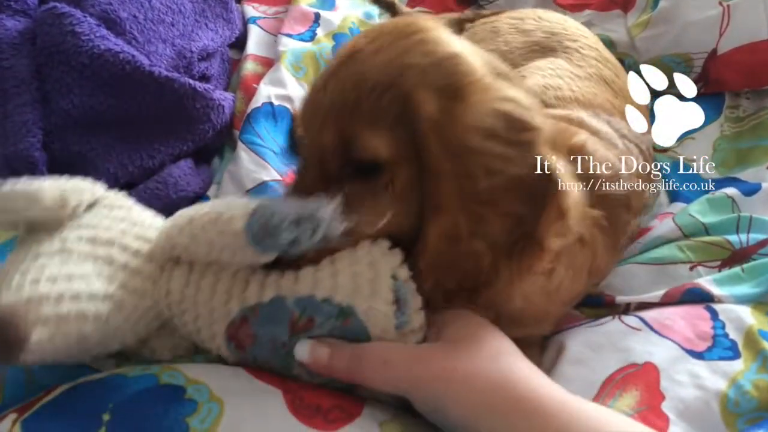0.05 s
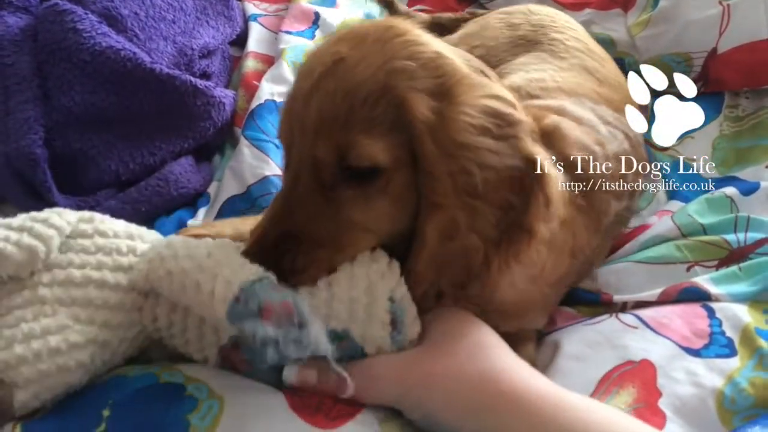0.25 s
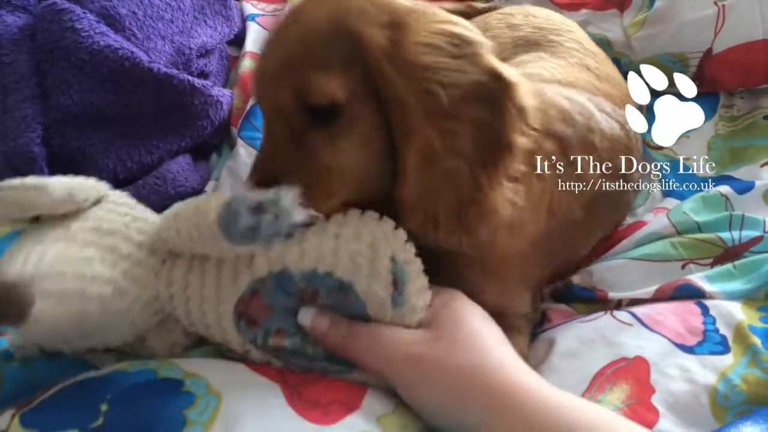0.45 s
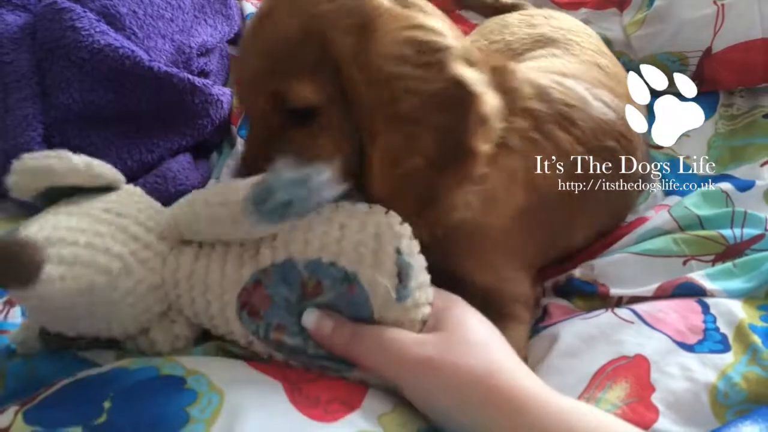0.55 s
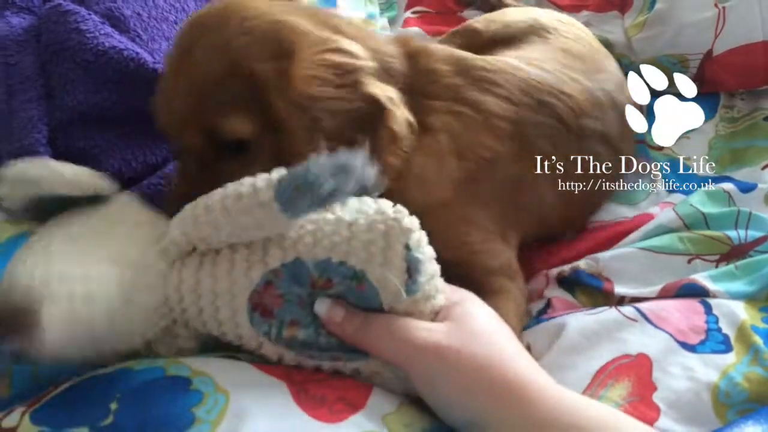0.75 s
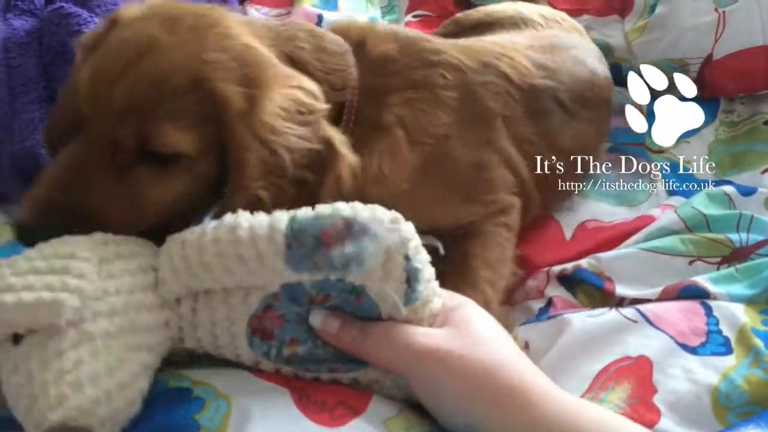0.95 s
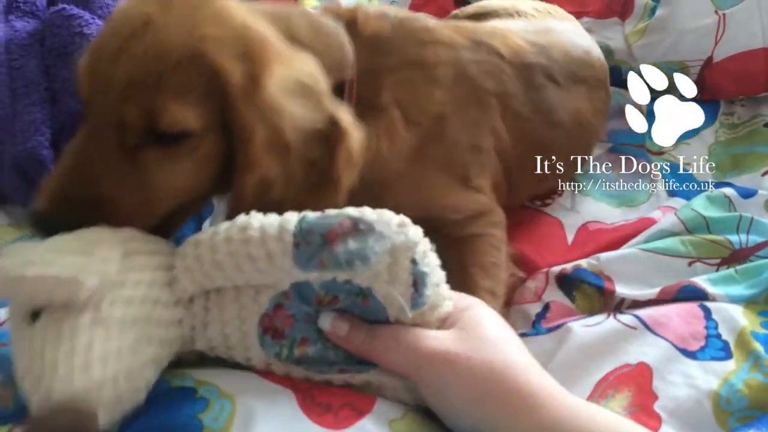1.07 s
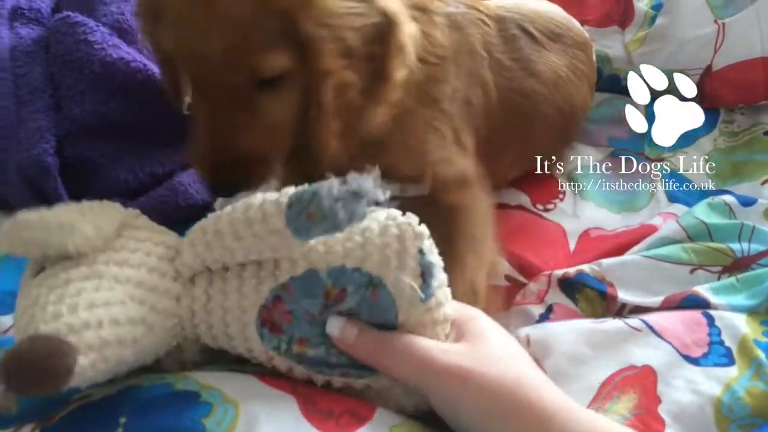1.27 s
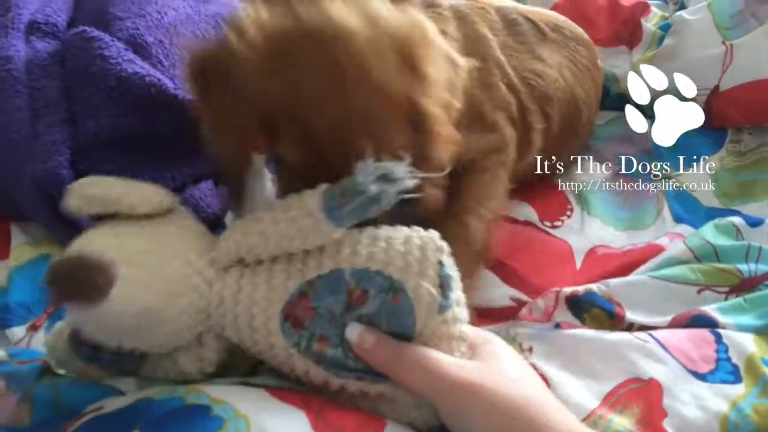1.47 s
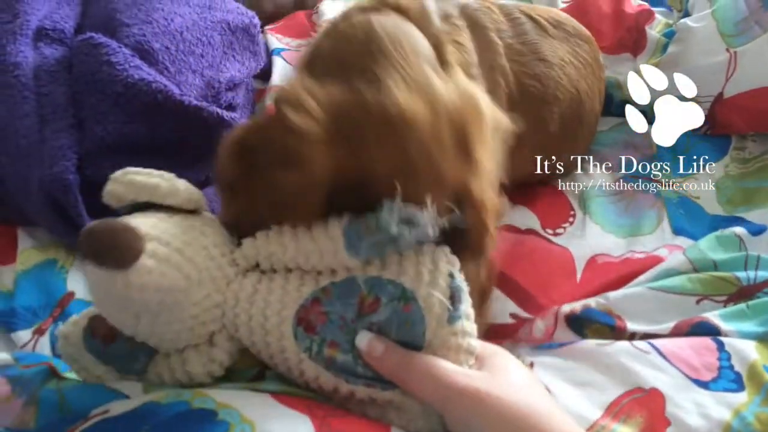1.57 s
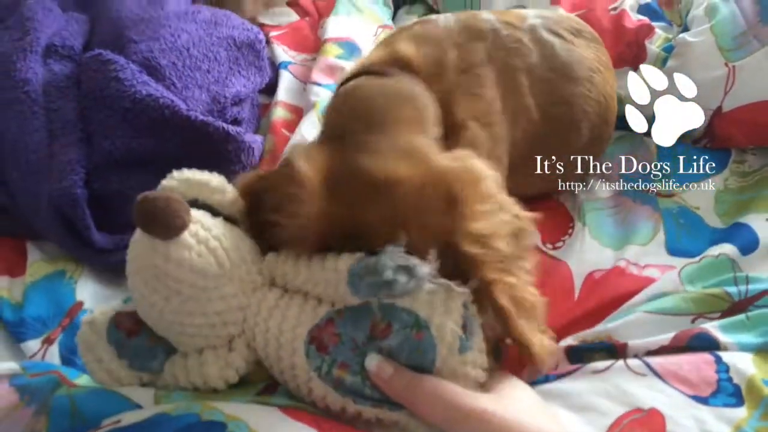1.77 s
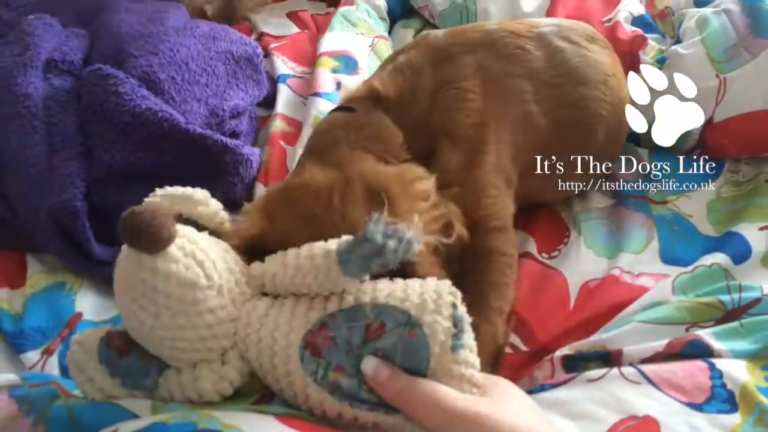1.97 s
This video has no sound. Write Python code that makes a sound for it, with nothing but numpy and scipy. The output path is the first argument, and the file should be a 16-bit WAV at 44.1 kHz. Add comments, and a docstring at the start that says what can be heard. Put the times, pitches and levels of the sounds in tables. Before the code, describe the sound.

A plush dog toy gives one very short, shrill squeak over faint rustling bedding indoors

```python
"""Rustling bedding is heard first, with dull knocks, dry snaps of teeth and faint clinks of a collar tag.
Then a puppy on a bed in a small room bites the squeaker of a plush toy once: a vibrating reed
sings a bright harmonic note, then sags and rasps as the air runs out, under a faint treble hiss.
Soft pops of mouth and toy are short tones that rise in pitch; knocks, snaps and tag are damped resonances.
Cloth, air and quiet background are coloured noise; wall echoes and a short tail make the room."""
import sys
import numpy as np
from scipy import signal
from scipy.fft import rfft, irfft
from scipy.io import wavfile

SR = 44100
rng = np.random.default_rng(int(sys.argv[2]) if len(sys.argv) > 2 else 0)


def file_out(sig):
    """Save sig as 16-bit WAV at sys.argv[1]."""
    # one column per channel
    cols = np.atleast_2d(sig).T
    # limit, then scale
    lim = np.clip(cols, -1, 1)
    pcm = np.round(lim * 32767).astype(np.int16)
    wavfile.write(sys.argv[1], SR, pcm)


N = 88905
T = np.arange(N) / SR  # seconds

# The reed through one bite. Each row: time in seconds, pitch in Hz, level in dB, air relative to the note in dB.
REED_COURSE = [(1.1052, 1850, -62.5, -23), (1.108, 1862, -14, -28), (1.118, 1867, -15, -28.5),
               (1.130, 1866, -15.5, -28.5), (1.135, 1921, -13.5, -27.5), (1.146, 1915, -14.2, -26.5),
               (1.152, 1895, -16.5, -21.5), (1.158, 1865, -16.5, -12), (1.164, 1632, -24, -6),
               (1.169, 1592, -28, -10), (1.175, 1500, -57.5, -9)]
# Spectral envelope of the squeaker. Each row: frequency in Hz, relative level of a harmonic there in dB.
REED_ENVELOPE = [(1550, 0.5), (1865, -7), (1920, -11), (3100, -3), (3780, -5.5), (5650, -3), (7570, 0.5),
                 (9300, -4), (9560, -4.5), (10200, -13), (11200, -6.5), (11500, -11.5), (12100, -29),
                 (13080, -13), (13420, -18), (14000, -43.5), (14950, -20.5), (15350, -37.5)]
# The pitch turns unsteady as it sags below SLACK_HZ; jitter is the rms fraction of the pitch.
JITTER, JITTER_SLACK, JITTER_RATE_HZ = 0.002, 0.013, 630
SLACK_HZ, SLACK_SPAN_HZ = 1850, 150
REED_LAG = 0.25  # the housing delays the upper harmonics (radians per harmonic number squared)
# Colour of the air through the reed. Each row: frequency in Hz, relative level in dB.
AIR_COLOUR = [(200, -49), (1200, -40.5), (1700, -10), (2100, -25), (2600, -43), (3400, -7.5), (4300, -18.5),
              (5200, -2.5), (7000, 0), (9200, 0.5), (10200, -7), (11200, 1), (12100, -21.5), (13200, -8),
              (14000, -31), (15100, -15)]
# Shrill side tones near the fifth harmonic. Each row: frequency in Hz, peak relative to the note's rms in dB.
SHRILL_TONES = [(9015, -15), (9188, -11)]
SHRILL_START_S, SHRILL_END_S, SHRILL_FADE_S = 1.108, 1.141, 0.004

# Treble hiss around the end of the note: start, level at the start, rise time and rate of fading.
HISS_S, HISS_DB, HISS_RISE_S, HISS_FADE_DB_PER_S = 1.143, -51.5, 0.006, 173.5
# Colour of that hiss. Each row: frequency in Hz, relative level in dB.
HISS_COLOUR = [(1000, -46.5), (4400, -21.5), (5200, -9), (8300, 2), (9600, 2), (11500, -4), (12200, -14.5),
               (13200, -11.5), (14000, -24.5), (15200, -19)]

# Soft pops of mouth and toy. Each row: start in seconds, peak in dB, start pitch in Hz, end pitch in Hz,
# half the time to the peak in seconds.
POP_EVENTS = [(1.157, -49, 703, 1100, 0.00032), (1.2339, -46, 1110, 1320, 0.00053),
              (1.2762, -30.5, 897, 1180, 0.00037), (1.3322, -26.5, 417, 1367, 0.00071)]
POP_GLIDE_S = 0.0018

# Dull knocks on the bedding. Each row: start in seconds, peak in dB, centre frequency in Hz.
KNOCK_EVENTS = [(0.2955, -53.5, 280), (0.458, -54, 326), (.4868, -35.5, 324), (0.498, -56, 327),
                (1.1014, -48.5, 130), (1.2761, -43.5, 296), (1.3327, -35.5, 291), (1.392, -58, 110)]
KNOCK_SPREAD = 1.7  # band edges of a knock, as a ratio to its centre
# Dry snaps of teeth on fabric. Each row: start in seconds, level in dB that the mode levels add to.
SNAP_EVENTS = [(0.296, -55.5), (.4866, -31), (1.2762, -70)]
# Resonances of a snap. Each row: frequency in Hz, relative level in dB, time to fall by 60 dB in seconds.
SNAP_RESONANCES = [(740, 4.5, 0.0037), (2360, -2, 0.0033), (5000, -19, 0.0047), (8500, -14.5, 0.00086)]
SNAP_LOW_HZ = 294

# Touches of the collar tag. Each row: start in seconds, level in dB that the mode levels add to,
# time to fall by 60 dB in seconds, initial rms of the contact noise in dB.
TAG_TOUCHES = [(0.405, -52, 0.065, -48.5), (.6255, -57, 0.066, -49.5), (1.338, -60, 0.054, -61),
               (1.4488, -58, .13, -78), (1.518, -52.5, .03, -50.5), (1.521, -52.5, 0.039, -53)]
# Modes of the tag. Each row: frequency in Hz, relative level in dB.
TAG_MODES = [(5010, -14.5), (8618, 3), (11500, -16)]
# Colour of the contact noise. Each row: frequency in Hz, relative level in dB.
CONTACT_COLOUR = [(500, -34), (2000, -3), (3300, -4), (8500, -1.5), (11000, -17), (15000, 1)]
CONTACT_S = 0.0015  # exponential decay time

# Light crackles of cloth. Each row: start in seconds, level in dB before CRACKLE_GAIN_DB, centre in Hz.
CRACKLE_EVENTS = [(0.295, -58, 5600), (0.655, -55, 1120), (0.967, -56, 10900)]
CRACKLE_GAIN_DB, CRACKLE_S = -6, 0.0022  # the second is an exponential decay time

# Movement on the bed. Each row: time in seconds, rustle level in dB, low shuffle level in dB.
BED_MOVEMENT = [(0, -64.5, -72), (.1, -73, -74), (.2, -72, -69.5), (.27, -68.5, -72.5), (.335, -66, -64.5),
                (.37, -69, -72), (.45, -66.5, -71), (.53, -77.5, -67.5), (.57, -72.5, -81), (.66, -68, -68),
                (.73, -76, -72), (.82, -68, -61.5), (.9, -74, -77), (1.03, -73, -83), (1.2, -79.5, -87.5),
                (1.35, -71.5, -70), (1.43, -78, -81), (1.46, -68, -76), (1.63, -67, -70), (1.76, -68, -72),
                (1.85, -73, -82), (2.02, -78.5, -91)]
# Colour of the rustle. Each row: frequency in Hz, relative level in dB.
RUSTLE_COLOUR = [(30, -35), (100, -12), (300, 1), (800, -2.5), (1500, -3), (2400, -9.5), (4000, -13),
                 (7000, -20), (15000, -27)]
# Colour of the shuffle. Each row: frequency in Hz, relative level in dB.
SHUFFLE_COLOUR = [(30, -31), (90, -1.5), (180, 0), (380, 1), (600, -11), (1500, -33), (6000, -56)]
GRAIN_DB, GRAIN_S = 1, 0.0054  # rms depth and time scale of the rustle's graininess

# Colour of the quiet air. Each row: frequency in Hz, relative level in dB.
FLOOR_COLOUR = [(20, -21.5), (38, -7.5), (52, 7.5), (75, 0.5), (150, -0.5), (400, -10.5), (1000, -13.5),
                (3000, -19), (6000, -22), (9000, -18.5), (15000, -24.5)]
FLOOR_DB = -71

# Decay of the room. Each row: frequency in Hz, time to fall by 60 dB in seconds.
ROOM_DECAY = [(200, 0.13), (1200, 0.21), (1900, .22), (5500, .23), (8000, 0.15), (15000, .16)]
# Strength of the room's tail. Each row: frequency in Hz, level in dB.
ROOM_LEVEL = [(200, -12.5), (1200, -16.5), (1900, -15), (3800, -26), (5700, -21.5), (8000, -24),
              (12000, -26), (15000, -25)]
ROOM_DELAY_S = 0.007
# Single echoes off the walls. Each row: delay in seconds, level in dB.
WALL_ECHOES = [(.0085, -21.5), (0.016, -27), (.039, -23.5)]
ECHO_TOP_HZ = 2600
LOW_CUT_HZ, EDGE_HZ = 42, 15450  # limits of the whole sound's band


def amp(db):
    """A level in decibels is twenty times the logarithm of the gain."""
    return 10 ** (np.asarray(db) / 20)


def unit(x):
    """Dividing a signal by its root mean square sets its rms to 1."""
    return x / np.sqrt(np.mean(x ** 2) + 1e-20)


def read(points, hz):
    """A spectrum is interpolated along a logarithmic frequency axis."""
    f, value = np.transpose(points)
    return np.interp(np.log(hz + 1), np.log(f + 1), value)


def add(mix, s, sound):
    """Superposition: a sound starting at s seconds adds to the mix."""
    part = mix[round(s * SR):][:len(sound)]
    part += sound[:len(part)]


def filtered_noise(gain):
    """White noise weighted by a gain per frequency bin, at rms 1."""
    return unit(irfft(rfft(rng.standard_normal(N)) * gain, N))


def noise(spectrum):
    """Coloured noise: white noise shaped by a spectral envelope."""
    return filtered_noise(amp(read(spectrum, np.fft.rfftfreq(N, 1 / SR))))


def wander(hz):
    """Smooth random fluctuation: white noise under a Gaussian low-pass."""
    return filtered_noise(np.exp(-(np.fft.rfftfreq(N, 1 / SR) / hz) ** 2))


def ring(hz, t60):
    """A damped mode: a sinusoid under exponential decay."""
    t = T[:SR // 4]
    return np.sin(2 * np.pi * hz * t) * np.exp(-np.log(1000) * t / t60)


def highpass(x, hz):
    """A second-order high-pass attenuates what lies below its corner."""
    return signal.sosfilt(signal.butter(2, hz, "highpass", fs=SR, output="sos"), x)


def shrill_tones():
    """Inharmonic partials beat with a harmonic close to them; here early in the bite."""
    tones = np.zeros(N)
    for hz, db in SHRILL_TONES:
        tones += amp(db) * np.cos(2 * np.pi * hz * T + 0.42 * wander(hz=150))
    to_nearest_end = np.minimum(T - SHRILL_START_S, SHRILL_END_S - T)
    return tones * np.clip(to_nearest_end / SHRILL_FADE_S, 0, 1)


def squeaker():
    """Self-sustained reed: it chops the air into harmonics; slack, it wobbles and hisses."""
    s, pitch, db, air_db = np.transpose(REED_COURSE)
    hz = np.interp(T, s, pitch)
    level = amp(np.interp(T, s, db)) * (T > s[0]) * (T < s[-1])
    slack = np.clip((SLACK_HZ - hz) / SLACK_SPAN_HZ, 0, 1)
    jitter = (JITTER + JITTER_SLACK * slack) * wander(JITTER_RATE_HZ)
    phase = 2 * np.pi * np.cumsum(hz * (1 + jitter)) / SR
    note = np.zeros(N)
    for k in range(1, 10):
        note += amp(read(REED_ENVELOPE, k * hz)) * np.cos(k * phase - REED_LAG * k ** 2)
    # rms 1 over the sustained part of the note
    note /= np.std(note[(T > s[1]) & (T < s[-4])])
    air = noise(AIR_COLOUR) * amp(np.interp(T, s, air_db))
    return level * (note + air + shrill_tones())


def treble_hiss():
    """Turbulent air: a faint treble hiss swells as the note sags and fades after it."""
    age = np.maximum(T - HISS_S, 0)
    rise = np.minimum(age / HISS_RISE_S, 1)
    return noise(HISS_COLOUR) * rise * amp(HISS_DB - HISS_FADE_DB_PER_S * age)


def pops():
    """Cavity resonance: an opening cavity gives a few cycles that rise in pitch."""
    out, t = np.zeros(N), T[:SR // 20]
    for s, db, start_hz, end_hz, swell in POP_EVENTS:
        hz = end_hz + (start_hz - end_hz) * np.exp(-(t / POP_GLIDE_S) ** 2)
        x = t / swell / 2  # reaches 1 at the peak
        shape = (x * np.exp(1 - x)) ** 2
        add(out, s, amp(db) * shape * np.sin(2 * np.pi * np.cumsum(hz) / SR))
    return out


def knocks():
    """Impulse response: a blow on the bedding excites one broad, heavily damped band."""
    out = np.zeros(N)
    for s, db, hz in KNOCK_EVENTS:
        edges = [hz / KNOCK_SPREAD, hz * KNOCK_SPREAD]
        band = signal.butter(2, edges, "bandpass", fs=SR, output="sos")
        bump = signal.sosfilt(band, signal.unit_impulse(SR // 10))
        add(out, s, amp(db) * bump / abs(bump).max())
    return out


def snaps():
    """Modal impact: teeth on fabric excite a few modes that die within milliseconds."""
    out = np.zeros(N)
    for s, db in SNAP_EVENTS:
        click = sum(amp(db + mode_db) * ring(hz, t60) for hz, mode_db, t60 in SNAP_RESONANCES)
        add(out, s, highpass(click, SNAP_LOW_HZ))
    return out


def collar_tag():
    """Modal vibration: a small metal disc is touched and rings until fur damps it."""
    out = np.zeros(N)
    for s, db, t60, contact_db in TAG_TOUCHES:
        add(out, s, sum(amp(db + mode_db) * ring(hz, t60) for hz, mode_db in TAG_MODES))
        add(out, s, amp(contact_db) * noise(CONTACT_COLOUR) * np.exp(-T / CONTACT_S))
    return out


def crackles():
    """Stick-slip: a slipping fold of cloth gives a tiny decaying burst of band noise."""
    out = np.zeros(N)
    for s, db, hz in CRACKLE_EVENTS:
        grit = noise([(hz / 2, -25), (hz, 0), (hz * 2, -25)])
        add(out, s, amp(db + CRACKLE_GAIN_DB) * grit * np.exp(-T / CRACKLE_S))
    return out


def bedding():
    """Friction noise: grainy rubbing of cloth over the low shuffle of the duvet."""
    s, rustle_db, shuffle_db = np.transpose(BED_MOVEMENT)
    grain = amp(GRAIN_DB * wander(1 / GRAIN_S))
    rustle = unit(noise(RUSTLE_COLOUR) * grain) * amp(np.interp(T, s, rustle_db))
    shuffle = noise(SHUFFLE_COLOUR) * amp(np.interp(T, s, shuffle_db))
    return rustle + shuffle


def quiet_air():
    """Stationary background: steady coloured noise, strongest in the bass."""
    return amp(FLOOR_DB) * noise(FLOOR_COLOUR)


def room(x):
    """Reverberation: dull wall echoes and a diffuse tail decaying at its own rate in each band."""
    hz, t, z = signal.stft(rng.standard_normal(SR // 2), SR, nperseg=256)
    rate = np.log(1000) / read(ROOM_DECAY, hz)[:, None]
    # the square root keeps the tail's energy independent of its decay time
    z = z * np.exp(-rate * t) * np.sqrt(2 * rate / SR) * amp(read(ROOM_LEVEL, hz))[:, None]
    tail = signal.istft(z, SR, nperseg=256)[1]
    out = np.zeros(N)
    add(out, ROOM_DELAY_S, signal.fftconvolve(x, tail))
    dull = signal.sosfilt(signal.butter(2, ECHO_TOP_HZ, fs=SR, output="sos"), x)
    for delay, db in WALL_ECHOES:
        add(out, delay, amp(db) * dull)
    return out


def scene():
    """Superposition: toy and dog sound in the room, over bedding and quiet air."""
    near = squeaker() + treble_hiss() + pops() + knocks() + snaps() + collar_tag() + crackles()
    return (near + room(near) + bedding() + quiet_air())[None]


def record(dry):
    """Band limitation: the bass rolls off gently and the extreme treble ends steeply."""
    dry = highpass(dry, LOW_CUT_HZ)
    taps = signal.firwin(401, EDGE_HZ, window=("kaiser", 8), fs=SR)
    return signal.oaconvolve(dry, taps[None], "same")


dry = scene()
out = record(dry)
file_out(out)
```